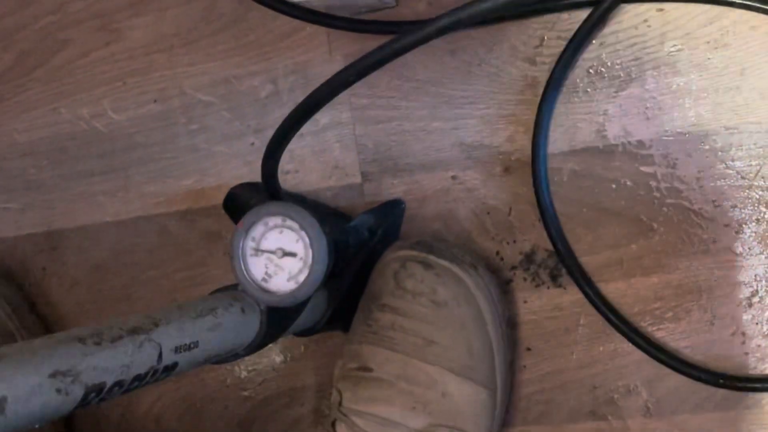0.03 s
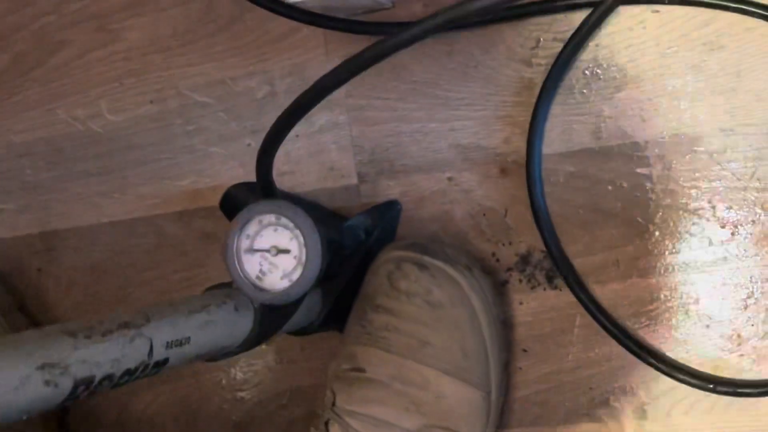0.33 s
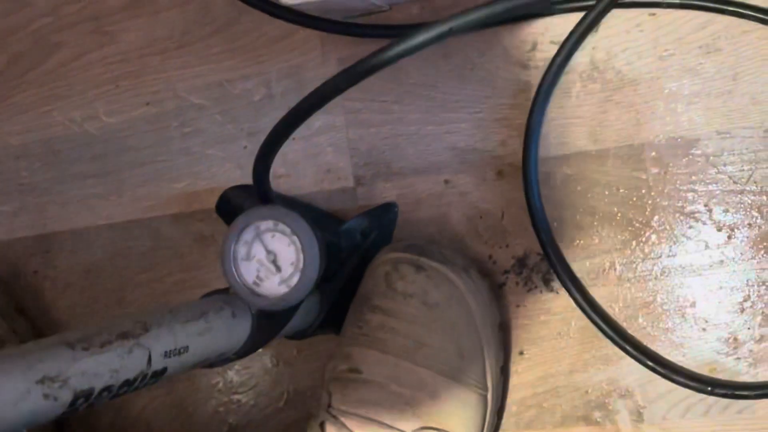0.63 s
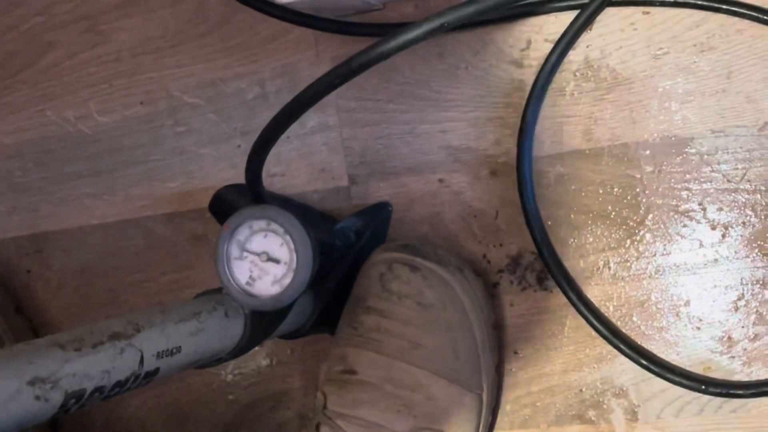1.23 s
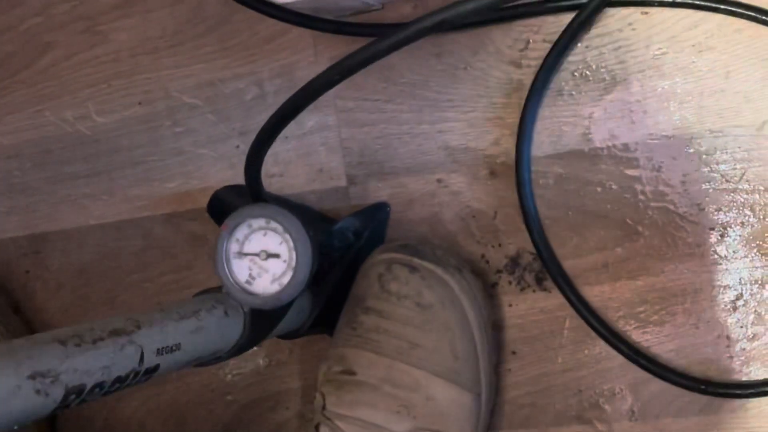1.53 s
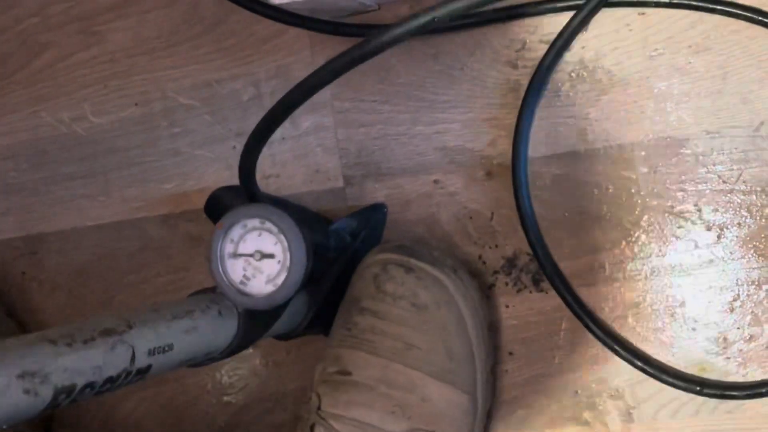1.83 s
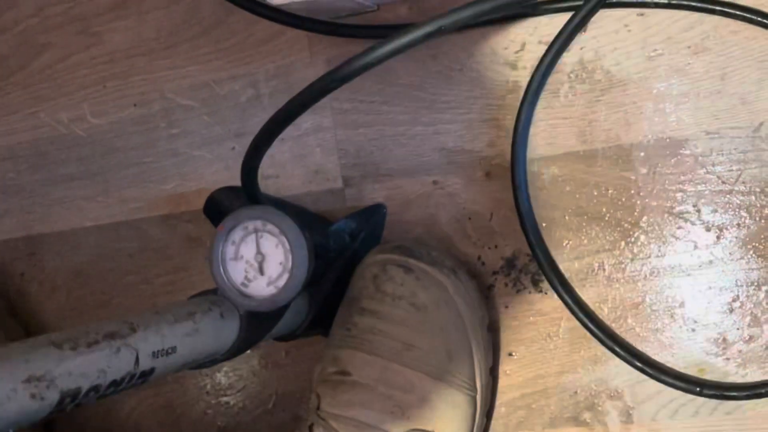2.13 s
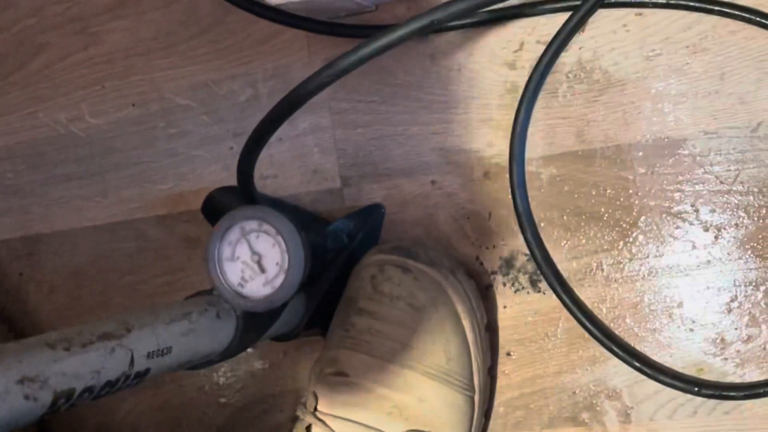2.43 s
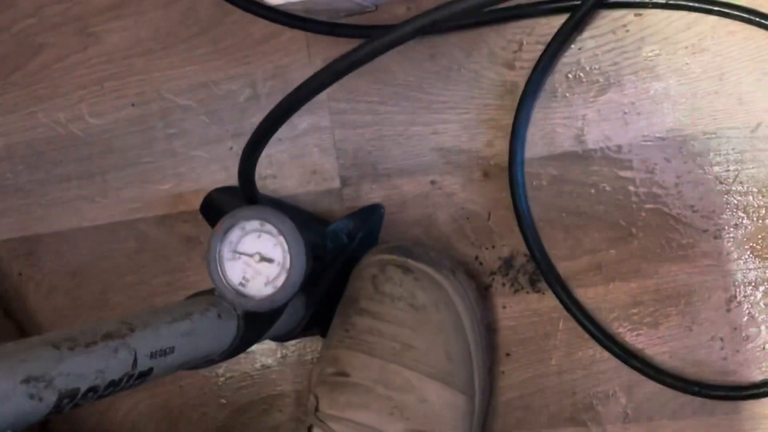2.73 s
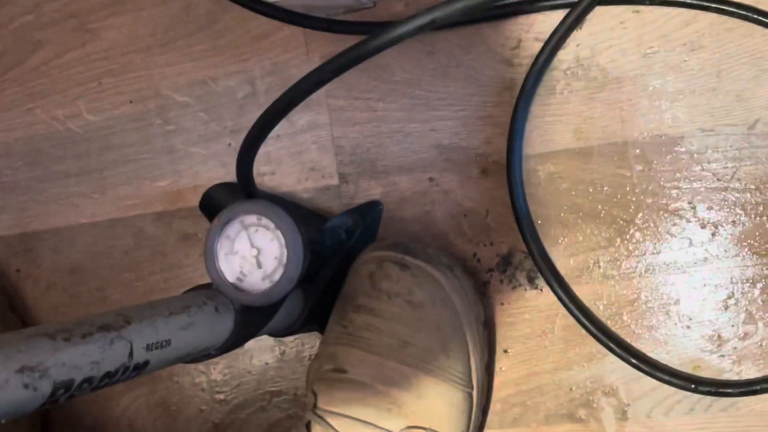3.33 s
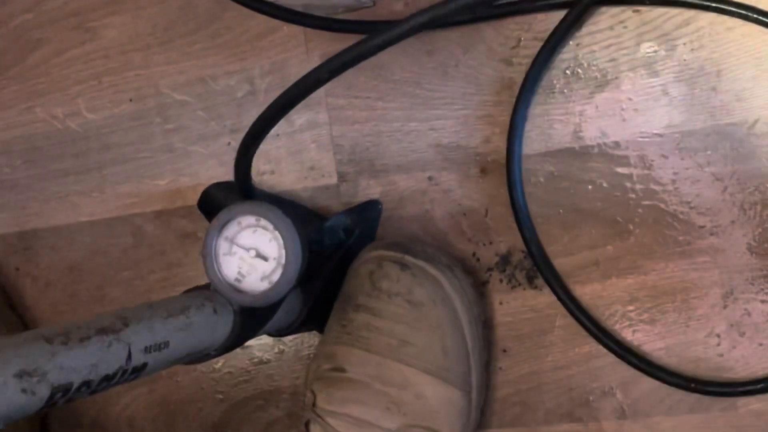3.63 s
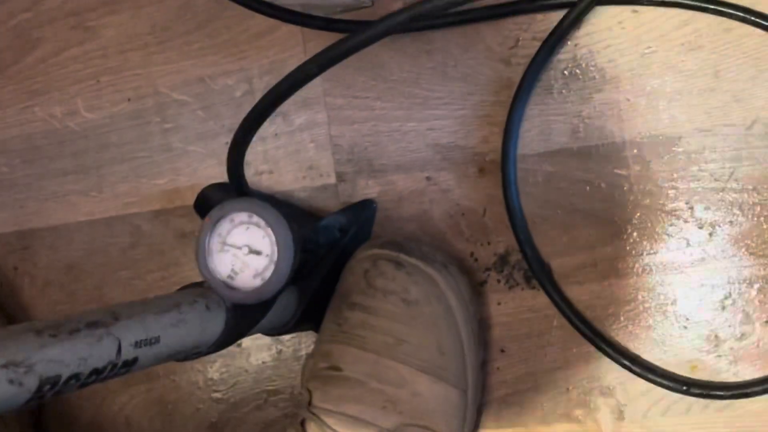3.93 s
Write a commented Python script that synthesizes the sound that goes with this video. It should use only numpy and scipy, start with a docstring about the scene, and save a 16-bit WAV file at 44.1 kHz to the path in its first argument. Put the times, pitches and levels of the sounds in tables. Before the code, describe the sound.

A floor pump pushes air in steady up and down strokes, heard close in a small room. Each push hisses and ends in a thump on wooden boards; each pull rushes and ends in a clack, the rod rattling lightly.

```python
"""A clack, then rushing air: a floor pump worked on a wooden floor, close to two microphone ports.
On each stroke air rushes through the barrel and the piston seal rubs; fast air whistles.
On the way down the valve adds a thin hiss. The piston clacks at the top and thumps, once as the first
push begins and twice at the bottom, ringing the floorboards; the rod rattles in its guide.
A small room and a low rumble lie behind."""
import sys
import numpy as np
from scipy import signal
from scipy.fft import rfft, irfft, next_fast_len
from scipy.io import wavfile
from scipy.ndimage import minimum_filter1d, map_coordinates

SR = 44100
rng = np.random.default_rng(int(sys.argv[2]) if len(sys.argv) > 2 else 0)


def bounce(signal):
    """Save signal as a 16-bit WAV file at the path given by the first command-line argument."""
    frames = np.transpose(np.atleast_2d(signal))
    limited = np.clip(frames, -1, 1)
    pcm = np.round(limited * 32767).astype(np.int16)
    wavfile.write(sys.argv[1], SR, pcm)


N = 176400
T = np.arange(N) / SR

# envelopes, one list per stroke: t/s, rush level/dB, rub level/dB
STROKES = [
    [(0.11, -92, -82), (0.136, -41, -46.5), (0.232, -32.5, -49.5), (0.376, -44.5, -53), (0.384, -55, -44),
     (0.404, -42, -51), (0.444, -48.5, -54.5), (0.656, -52, -57.5), (0.81, -71, -71)],
    [(1.05, -79, -74), (1.11, -48, -48), (1.132, -54, -58), (1.184, -37, -46.5), (1.256, -39, -48.5),
     (1.33, -36.5, -47), (1.394, -43.5, -56), (1.42, -45, -46), (1.435, -40, -58)],
    [(1.61, -74, -73), (1.636, -48.5, -53), (1.712, -29.5, -44.5), (1.752, -27, -48), (1.778, -39, -51.5),
     (1.848, -44, -55.5), (1.874, -37, -42.5), (1.884, -49, -50), (1.94, -48.5, -54), (2.21, -55, -63.5)],
    [(2.34, -52, -71), (2.372, -49.5, -46), (2.48, -34, -47), (2.518, -37.5, -48.5), (2.574, -30.5, -37.5),
     (2.622, -45.5, -55.5), (2.638, -40, -50.5), (2.686, -43, -53.5), (2.77, -60, -64.5)],
    [(2.79, -54, -64), (2.826, -43, -55), (2.866, -38.5, -53), (2.88, -43, -60), (2.934, -33.5, -44.5),
     (2.956, -41, -52.5), (3.176, -47.5, -58), (3.222, -58, -85), (3.25, -60, -78)],
    [(3.28, -57, -54.5), (3.3, -48.5, -62), (3.318, -49, -56.5), (3.41, -37.5, -48.5), (3.448, -39, -50),
     (3.472, -42, -53), (3.48, -61, -58)],
    [(3.655, -65, -62), (3.673, -34, -44), (3.697, -40, -51), (3.727, -35.5, -47), (3.781, -37, -51),
     (3.919, -46.5, -57.5), (3.931, -38, -48), (3.953, -45, -53.5), (4.0, -46, -54.5)],
]
# air column modes of the barrel: f/Hz, level/dB
COLUMN_MODES = [(440, -12), (690, -8.5), (1060, -8.5), (1530, -12.5), (1850, -13.5), (2230, -7),
                (2830, -6.5), (3880, -9.5)]
# downstrokes, valve open: start/s, end/s, level/dB
DOWNSTROKES = [(0.121, 0.825, -39), (1.675, 2.223, -38), (2.9, 3.287, -40), (3.693, 4.083, -38)]
# end-of-stroke spurts: peak t/s, 20 dB rise/s, t60/s, level/dB
SPURTS = [(0.856, 0.038, 0.086, -31), (2.27, 0.05, 0.082, -30.5), (3.492, .003, 0.48, -29.5)]
# valve ticks: t/s, level/dB
VALVE_TICKS = [(.383, -18.5), (1.02, -35.5), (1.565, -35), (1.412, -29.5), (1.446, -26), (3.559, -16)]
# whistles: peak t/s, rise sigma/s, fade sigma/s, f/Hz, level/dB
WHISTLES = [(.24, 0.11, 0.08, 6700, -41.5), (1.19, 0.022, 0.088, 6930, -38),
            (1.312, 0.017, 0.031, 6900, -32.5), (1.753, 0.037, 0.0086, 6600, -30),
            (2.565, .06, 0.025, 6480, -33.5), (2.93, 0.023, 0.012, 6500, -32.5),
            (3.41, 0.027, 0.019, 7400, -42.5), (3.494, 0.0031, 0.036, 6630, -31),
            (3.79, 0.046, 0.051, 6700, -41)]
# low thumps, one as the first push begins, two at the bottom: t/s, level/dB, floor tilt/(dB/octave)
THUMPS = [(0.139, -7.5, -5.5), (.859, 0.5, 2), (2.272, 1.5, 2)]
# piston at the top: t/s, floor level/dB, floor tilt/(dB/octave), barrel level/dB
CLACKS = [(-.016, -0.5, 0.5, 4.5), (1.447, -1, 0.5, -2), (3.562, -0.5, 0.6, -1.5)]
# rod in its guide: t/s, level/dB, ring f/Hz, floor level/dB
KNOCKS = [(0.223, -26.5, 754, -27.5), (1.076, -43, 455, -31), (1.201, -28.5, 664, -53),
          (1.316, -31, 470, -50), (1.373, -25.5, 454, -52), (1.411, -29, 651, -40),
          (1.641, -29.5, 405, -31), (1.658, -36, 445, -46), (1.708, -31, 610, -51.5),
          (1.865, -28.5, 460, -28), (1.892, -20.5, 454, -21.5), (1.957, -29.5, 398, -25.5),
          (1.985, -35.5, 450, -34), (2.476, -27.5, 640, -27), (2.484, -24.5, 464, -37),
          (2.54, -23, 675, -44), (2.558, -25.5, 470, -26.5), (2.756, -40, 450, -32), (2.811, -30, 425, -39),
          (2.926, -25.5, 480, -41), (3.36, -26, 470, -27.5), (3.396, -28.5, 433, -26),
          (3.429, -27.5, 452, -46), (3.674, -28, 470, -13.5), (3.724, -36, 770, -29.5)]
# rod against the barrel: t/s, level/dB, ring f/Hz
RAPS = [(.138, -26, 800), (1.888, -23.5, 2080), (3.559, -17, 1893), (3.723, -25.5, 790)]
# floorboard modes: f/Hz, t60/s, thump or knock level/dB, clack level/dB
BOARD_MODES = [(72.6, 0.17, -10, -4.5), (83.4, 0.28, -33, -13.5), (122.54, 0.14, -3.5, -3),
               (139.8, 0.093, -4.5, -1.5), (173.5, 0.33, -24.5, -23.5), (212.1, 0.2, -20, -21.5),
               (259.7, 0.098, -12.5, -23.5), (300.2, 0.127, -17, -27.5), (401, 0.21, -37, -43),
               (446, .2, -31, -62), (492, 0.12, -32.5, -28.5), (699, 0.032, -36, -12.5),
               (764, 0.022, -23, -6), (876, .04, -34.5, -28), (1110, 0.034, -52, -21),
               (1404, 0.03, -66, -24), (1745, 0.052, -67, -30)]
# noise spectra: f/Hz, level/dB
RUSH_SPECTRUM = [(1500, -37), (4000, -6), (5200, -2.5), (6900, 1.5), (8000, 2.5), (9300, 1.5), (10600, 3.5),
                 (11600, -4.5), (13000, -15), (15000, -50)]
RUB_SPECTRUM = [(300, -10.5), (470, 11.5), (570, -22), (720, -4), (900, 8), (1080, 1), (1500, -1.5),
                (2400, 6.5), (3400, 3), (4400, -7), (6000, 2.5), (12000, -52)]
VALVE_SPECTRUM = [(5000, -30), (8300, -10), (9400, 2), (10200, 8), (10900, 10), (11400, 6.5), (12200, -1.5),
                  (13200, -13.5), (15000, -40)]
SPURT_SPECTRUM = [(1500, -8), (4800, -3), (6200, 0.5), (7800, -1.5), (9200, -1), (11000, 10), (12500, -8),
                  (15000, -24)]
BARREL_SPECTRUM = [(150, 3), (370, -8), (470, 0), (570, -5), (680, 2.5), (850, -2), (1300, -11),
                   (1900, -9.5), (3000, -17), (7000, -18.5), (11000, -12), (14000, -64)]
RUMBLE_SPECTRUM = [(20, -71), (45, -8), (70, -5), (120, -3.5), (200, -12), (400, -22), (1000, -27.5),
                   (3000, -30.5), (6500, -33), (10500, -21.5), (14000, -62)]
# room decay: f/Hz, t60/s
ROOM_T60 = [(70, 0.88), (150, 0.51), (400, 0.17), (2000, 0.29), (10000, 0.13)]
# lead of the left port: f/Hz, phase/rad
PORT_PHASE = [(400, 0), (750, -.45), (1100, .1), (1900, 0), (2800, 1.2), (3600, .3), (4300, 1.5),
              (4850, 3.1), (5650, 6.1), (6100, 6.4), (7000, 7.3), (8800, 9.3), (9400, 9.55), (10000, 10.1),
              (11200, 11.3), (11900, 12.5)]
# left port minus right: f/Hz, level/dB
PORT_BALANCE = [(100, 0.65), (350, -2.9), (600, 2.5), (850, -7), (1200, 5), (2000, -3), (3100, 1.5),
                (4500, -0.5), (5500, -0.5)]
# noise that differs between ports, side re mid: f/Hz, level/dB
PORT_SCATTER = [(100, -34.5), (700, -3), (1700, -23), (2800, -7), (4400, 0), (6000, -32), (12000, -70)]


def barrel_air(rush_trim_db=1.5, rub_trim_db=3, flutter_db=1.9, edge_s=0.015):
    """Air rushes through the barrel on each stroke; the rubbing seal stirs the air column."""
    rush, rub, travel = np.zeros((3, N))
    for stroke in STROKES:
        times, rush_db, rub_db = np.transpose(stroke)
        gate = np.clip(1 + np.minimum(T - times[0], times[-1] - T) / edge_s, 0, 1)
        rush += gate * amp(np.interp(T, times, rush_db) + rush_trim_db)
        rub += gate * amp(np.interp(T, times, rub_db) + rub_trim_db)
        travel = np.where(T >= times[0], np.interp(T, times[[0, -1]], [-.5, .5]), travel)
    column = rub * air_column(travel)
    flow = rush * amp(flutter_db * wobble(110)) * noise(RUSH_SPECTRUM)
    return column + barrel_echoes(flow + rub * seal_rub())


def air_column(travel, trim_db=-3.5, width_hz=35, sag=0.1):
    """Narrow, noisy modes of the barrel's air; pitch sinks over each stroke."""
    rad_per_hz = 2 * np.pi * np.cumsum(1 - sag * travel) / SR
    out = np.zeros(N)
    for hz, db in COLUMN_MODES:
        phase = hz * rad_per_hz
        out += amp(db + trim_db) * (wobble(width_hz) * np.sin(phase) + wobble(width_hz) * np.cos(phase))
    return out


def seal_rub(catches_per_s=39, catch_t60_s=0.03, catch_trim_db=3):
    """Friction noise of the seal, with small random catches."""
    friction = amp(1.25 * wobble(40.8)) * noise(RUB_SPECTRUM)
    kicks = (rng.random(N) < catches_per_s / SR) * rng.uniform(1.0, 2.63, N)
    catches = signal.lfilter([1], [1, -amp(-60 / (catch_t60_s * SR))], kicks)
    return friction + amp(catch_trim_db) * catches * noise(BARREL_SPECTRUM)


def barrel_echoes(x, max_delay_s=0.014, echo_db=-6.5, changes_per_s=3.93):
    """Close echoes give narrow resonances; crossfaded random sets stand for the piston's motion."""
    out, place = np.zeros_like(x), T * changes_per_s
    for k in range(int(place[-1]) + 2):
        delays_s, gains = rng.uniform(.001, max_delay_s, size=10), rng.standard_normal(size=10)
        echoes = np.bincount((delays_s * SR).astype(int), gains * amp(echo_db) / np.linalg.norm(gains))
        echoes[0] = 1  # direct path
        echoes /= np.linalg.norm(echoes)
        near = np.abs(place - k) < 1
        if near.any():
            part = x[:, near] * (1 - np.abs(place[near] - k))
            out[:, near] += signal.fftconvolve(part, echoes[None], axes=1)[:, :near.sum()]
    return out


def valve(rise_s=0.032, fall_s=0.071, sag_db_per_s=9, tick_t60_s=0.024, flutter_db=1.64):
    """A thin hiss that sags as the piston slows, plus spurts and ticks."""
    flow, spurts = np.zeros((2, N))
    for start, end, db in DOWNSTROKES:
        gate = np.clip((T - start) / rise_s, 0, 1) * np.clip((end - T) / fall_s, 0, 1)
        flow += gate * amp(db - sag_db_per_s * (T - start))
    for s, swell_s, t60_s, db in SPURTS:
        spurts += amp(db - 20 * np.maximum(s - T, 0) / swell_s - 60 * np.maximum(T - s, 0) / t60_s)
    ticks = sum(amp(db) * burst(s, 0.00045, tick_t60_s) for s, db in VALVE_TICKS)
    flutter = amp(flutter_db * wobble(55))
    return flutter * (flow * noise(VALVE_SPECTRUM) + (spurts + ticks) * noise(SPURT_SPECTRUM))


def whistles(half_width_hz=610, flutter_db=2.5):
    """Fast air gathers into a narrow, breathy band."""
    out = np.zeros(N)
    for s, rise_s, fade_s, peak_hz, db in WHISTLES:
        white = rng.standard_normal(N)
        band = filtered(white, lambda hz: 1 / (1 + ((hz - peak_hz) / half_width_hz) ** 2))
        swell = np.exp(-((T - s) / np.where(T < s, rise_s, fade_s)) ** 2 / 2)
        out += amp(db) * swell * band / band.std()
    return out * amp(flutter_db * wobble(80))


def seal_squeak(at_s=0.963, length_s=0.04, pitch_hz=2780, level_db=-52):
    """One faint, unsteady tone as the piston turns at the bottom."""
    swell = np.exp(-(2 * (T - at_s) / length_s) ** 2)
    return amp(level_db) * swell * np.sin(2 * np.pi * pitch_hz * T + wobble(200))


def barrel_rattle(clack_trim_db=-12.5, thump_trim_db=-25, t60_s=0.065):
    """Clacks and thumps rattle the barrel."""
    clacks = sum(amp(db + clack_trim_db) * burst(s, 0.00037, t60_s) for s, _, _, db in CLACKS)
    thumps = sum(amp(db + thump_trim_db) * burst(s, 0.00016, t60_s) for s, db, _ in THUMPS)
    return (clacks + thumps) * noise(BARREL_SPECTRUM)


def rod_knocks(rise_s=0.0023, rattle_t60_s=0.031, ring_t60_s=0.043):
    """The rod knocks in its guide: a rattle and a short hollow note, each knock with its own pitch."""
    out, rattle = np.zeros(N), noise(BARREL_SPECTRUM)
    for s, db, hz, _ in KNOCKS:
        ring = amp(db - 1.5) * burst(s, rise_s, ring_t60_s) * np.sin(2 * np.pi * hz * (T - s))
        out = out + ring + amp(db + 0.5) * burst(s, rise_s, rattle_t60_s) * rattle
    return out


def rod_raps(rise_s=0.00021, t60_s=0.035, ring_db=-4):
    """The rod strikes the barrel: a sharp crack with a brief ring."""
    out, crack = np.zeros((2, N)), noise(BARREL_SPECTRUM)
    for s, db, hz in RAPS:
        ring = amp(ring_db) * np.sin(2 * np.pi * hz * (T - s))
        out += amp(db) * burst(s, rise_s, t60_s) * (crack + ring)
    return out


def floorboards(rise_cycles=1.1, rattle_per_s=90, rattle_rad_per_khz=1.16, spread_db=0.61):
    """Clacks, thumps and knocks ring the floor; low modes build slowly, high ones are rough."""
    blows = [(s, db, tilt, True) for s, db, tilt, _ in CLACKS]
    blows += [(s, db, tilt, False) for s, db, tilt in THUMPS]
    blows += [(s, db, 0, False) for s, _, _, db in KNOCKS]
    out, t = np.zeros(N + 2 * SR), np.arange(SR // 4) / SR
    pivot_hz = BOARD_MODES[2][0]
    for s, db, tilt, hard in blows:
        for hz, t60_s, soft_db, hard_db in BOARD_MODES:
            level_db = db + (hard_db if hard else soft_db) + tilt * np.log2(hz / pivot_hz)
            level_db += rng.normal(0, spread_db)
            age_s = t - rise_cycles / hz / 2
            swell = 1 - np.exp(-(t * hz / rise_cycles) ** 3)
            envelope = swell * amp(level_db - 60 * age_s / t60_s)
            rattle_rad = rattle_rad_per_khz * hz / 1000 * wobble(rattle_per_s, t)
            out[SR + round(s * SR):][:len(t)] += envelope * np.sin(2 * np.pi * hz * t + rattle_rad)
    return out[SR:SR + N]


def room(x, level_db=-18.5):
    """Reverberation of a small room; the bass lingers longest."""
    hz, t, bins = signal.stft(rng.standard_normal(SR), SR, nperseg=256)
    decay = amp(-60 * t / along(ROOM_T60, hz)[:, None])
    tail = signal.istft(bins * decay, SR, nperseg=256)[1]
    tail = np.pad(tail / np.linalg.norm(tail), (SR // 60, 0))  # pre-delay
    return amp(level_db) * signal.fftconvolve(x, tail[None], axes=1)[:, :N]


def rumble(level_db=-46):
    """Steady low background noise."""
    return amp(level_db) * noise(RUMBLE_SPECTRUM)


def gain_control(x, threshold_db=-8.5, slope=0.42, hold_s=0.081, smooth_s=0.096):
    """The gain dips just after each loud blow, then recovers."""
    peak_db = 20 * np.log10(np.abs(x).max(axis=0) + 1e-9)
    gain_db = np.minimum(0, slope * (threshold_db - peak_db))
    hold = int(hold_s * SR)
    held_db = minimum_filter1d(gain_db, hold, origin=(hold - 1) // 2)
    pole = np.exp(-1 / (smooth_s * SR))
    return x * amp(signal.lfilter([1 - pole], [1, -pole], held_db))


def amp(db):
    """Decibels to gain."""
    return 10 ** (np.asarray(db) / 20)


def along(points, hz):
    """Interpolate (f/Hz, value) points on a log axis."""
    f, value = np.transpose(points)
    return np.interp(np.log(hz + 1), np.log(f + 1), value)


def filtered(x, response):
    """Apply response(f/Hz) by FFT."""
    size = next_fast_len(N + SR // 2)
    return irfft(rfft(x, size) * response(np.fft.rfftfreq(size, 1 / SR)), size)[..., :N]


def noise(spectrum):
    """Coloured noise, rms 1, partly shared by the two ports."""
    mid = rng.standard_normal(N)
    side = filtered(rng.standard_normal(N), lambda hz: amp(along(PORT_SCATTER, hz)))
    x = filtered(np.array([mid + side, mid - side]), lambda hz: amp(along(spectrum, hz)))
    return x / x.std()


def wobble(knots_per_s, t=T):
    """Smooth random curve."""
    return map_coordinates(rng.standard_normal(int(len(t) * knots_per_s / SR) + 4), [t * knots_per_s])


def burst(start_s, rise_s, t60_s):
    """Envelope: fast rise, exponential decay."""
    out, live = np.zeros(N), (T > start_s) & (T < start_s + 2 * t60_s)
    t = T[live] - start_s
    out[live] = (1 - np.exp(-(t / rise_s) ** 2)) * amp(-60 * t / t60_s)
    return out


def scene():
    """Pump air and impacts, the room's answer to the impacts, background rumble."""
    hits = barrel_rattle() + floorboards() + rod_raps()
    air = barrel_air() + barrel_echoes(valve()) + whistles()
    hits += rod_knocks()
    return air + seal_squeak() + hits + room(hits) + rumble()


def record(dry, low_cut_hz=47, top_hz=15200):
    """Two ports differing in phase and level, then low cut, gain control and top cut."""
    sides = np.array([[0.5], [-0.5]])
    ports = filtered(dry, lambda hz: np.exp(1j * sides * along(PORT_PHASE, hz))
                     * amp(sides * along(PORT_BALANCE, hz)))
    ports = signal.sosfilt(signal.butter(3, low_cut_hz, "high", fs=SR, output="sos"), ports)
    return filtered(gain_control(ports), lambda hz: hz < top_hz)


dry = scene()
out = record(dry)
bounce(out)
```